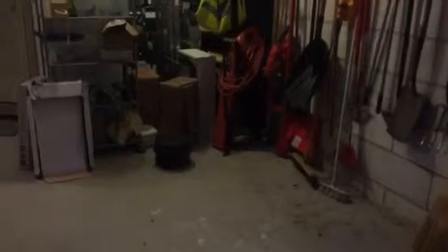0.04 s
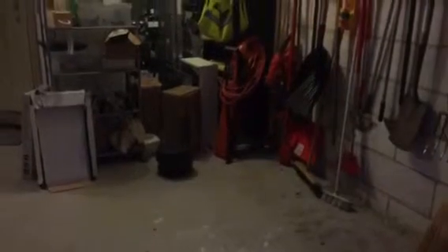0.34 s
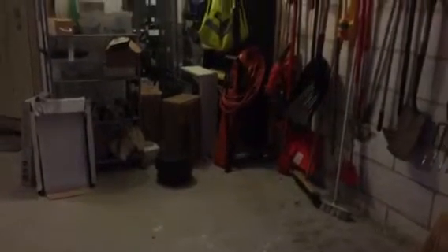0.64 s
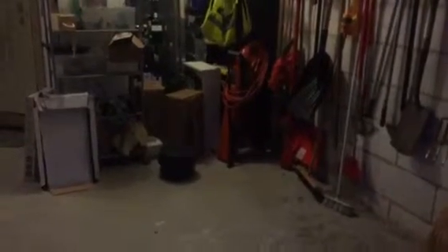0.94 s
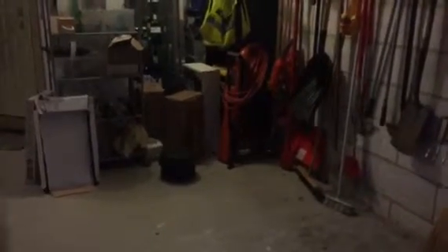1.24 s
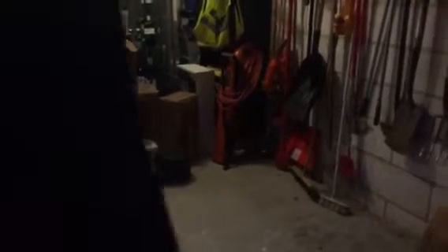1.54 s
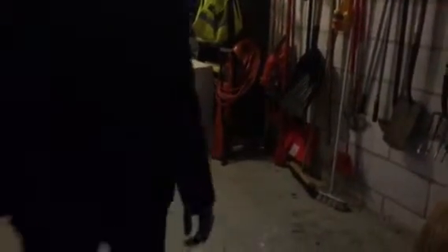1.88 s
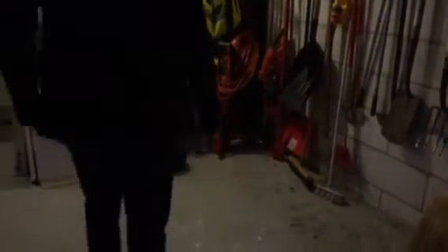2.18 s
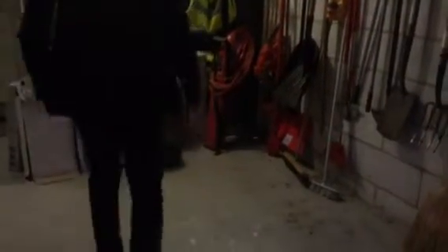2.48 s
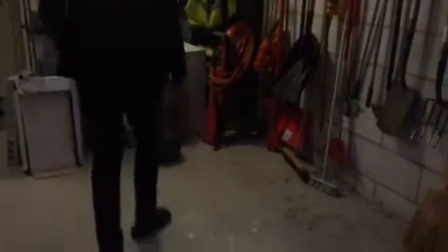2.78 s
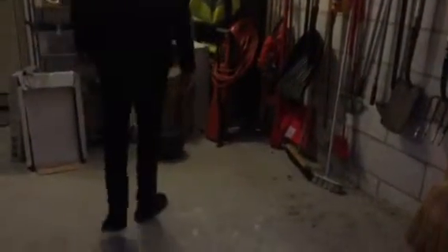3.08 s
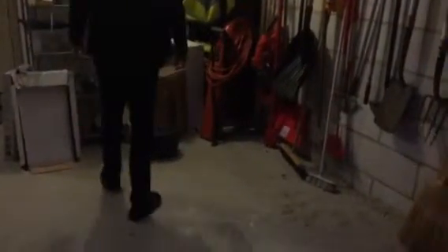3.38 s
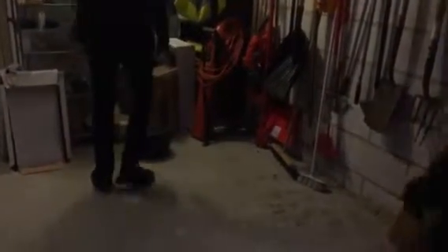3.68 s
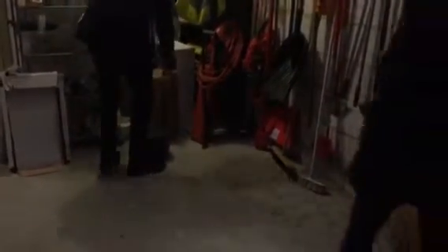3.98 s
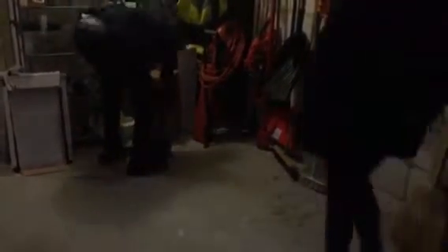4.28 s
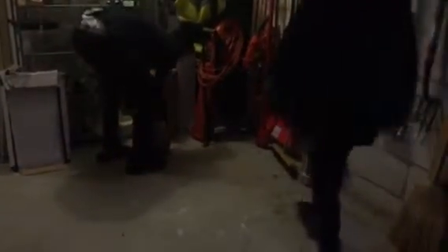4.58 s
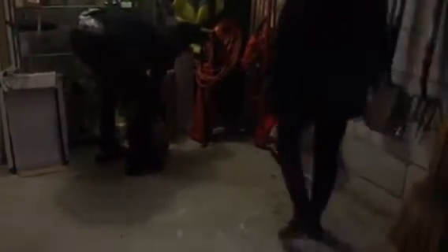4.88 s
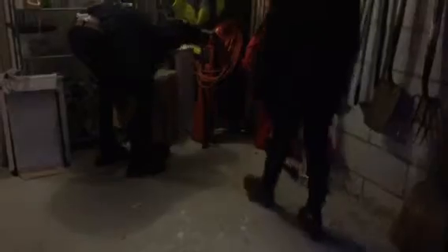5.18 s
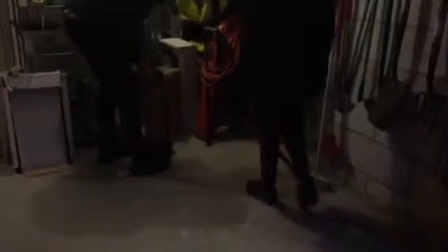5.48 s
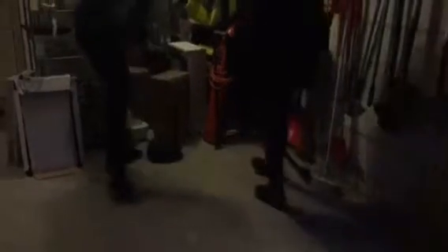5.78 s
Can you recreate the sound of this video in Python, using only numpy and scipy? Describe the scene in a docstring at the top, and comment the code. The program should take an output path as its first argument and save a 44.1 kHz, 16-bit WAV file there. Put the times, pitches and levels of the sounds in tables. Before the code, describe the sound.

In a quiet, cluttered garage with little echo, uneven footsteps scuff and crunch on concrete. Early on, clothing swishes and a hollow object gives a quick, rattling run of knocks nearby, the loudest sound. The steps go on with tiny squeaks and cracking grit. Near the end a heavy case grinds briefly across the floor, bumps a shelf and is set down, and a small metal fitting clinks faintly.

```python
"""Two people shuffle across the gritty concrete floor of a cluttered garage and shift a heavy case.
Over a quiet rumble, soles scrape, tap and thud from the start; grit snaps and rubber squeaks briefly.
From 1.6 s jackets rustle, and just before 2 s something hollow is knocked nearby and rattles.
After more steps, near 5 s, the case is dragged, tipped against a shelf and set down. Last, a small
metal fitting clinks as the case is let go. The stored things keep the room's echo short."""
import sys
import numpy as np
from scipy import signal
from scipy.fft import rfft, irfft, next_fast_len
from scipy.io import wavfile

SR = 44100
rng = np.random.default_rng(int(sys.argv[2]) if len(sys.argv) > 2 else 0)


def transcribe(u):
    """Save the signal u as a 16-bit wav file named by the first command-line argument.

    u: samples, shape (n,) or (channels, n), limited to [-1, 1]; the rate is SR.
    q: integer samples, one column per channel.
    """
    v = np.clip(np.atleast_2d(u).T, -1, 1)
    q = np.round(v * 32767).astype(np.int16)
    wavfile.write(sys.argv[1], SR, q)


N = 257385
TIME = np.arange(N) / SR
SHOT = TIME[:SR // 2]  # half a second: the clock for one short sound


def undb(db):
    """Turn decibels into a number to multiply by."""
    return 10 ** (np.asarray(db) / 20)


def unit(x):
    """Scale x to an average strength (rms) of 1."""
    return x / np.sqrt(np.mean(x ** 2))


def along(points, hz):
    """Read between the (f/Hz, value) rows of a table, with octaves evenly spaced."""
    f, value = np.transpose(points)
    return np.interp(np.log(hz + 1), np.log(f), value)


def colour(x, points):
    """Shape the tone of x by (f/Hz, level/dB) rows; clicks keep their sharp start."""
    size = next_fast_len(len(x) + 2048, True) * 2
    gains = undb(along(points, np.fft.rfftfreq(size, 1 / SR)))
    cepstrum = irfft(np.log(gains))
    cepstrum[1:size // 2] *= 2  # folded so the filter rings only after a click
    cepstrum[size // 2 + 1:] = 0
    return irfft(rfft(x, size) * np.exp(rfft(cepstrum)))[:len(x)]


def band(x, hz, kind="bandpass", order=2):
    """Keep what lies between, below or above the given frequencies."""
    return signal.sosfilt(signal.butter(order, np.minimum(hz, SR / 2 - 1), kind, fs=SR, output="sos"), x)


def fade(t60):
    """A dying sound; t60, the fade time, is the seconds it takes to drop 60 dB."""
    return np.exp(-np.log(1000) * SHOT / max(t60, 1 / SR))


def add(out, s, x):
    """Mix x into out, starting at s seconds."""
    i = max(int(s * SR), 0)
    out[i:i + len(x)] += x[:max(N - i, 0)]


def grains(rate, spread_db):
    """Random clicks, about rate a second; spread_db makes a few louder (+) or softer (-)."""
    sizes = undb(spread_db * np.minimum(rng.exponential(size=N), 4))
    return unit((rng.random(N) < rate / SR) * sizes * rng.standard_normal(N))


def shifting(x, depth_db, width_hz, hold_s):
    """Narrow bands of x grow and shrink as the rubbing surfaces touch in new places."""
    _, _, frames = signal.stft(x, nperseg=1024, noverlap=768)
    peaks = rng.standard_normal(frames.shape)
    for axis, span in enumerate((width_hz * 1024 / SR, hold_s * SR / 256)):
        keep = np.exp(-1 / span)
        peaks = signal.lfilter([1], [1, -keep], peaks, axis=axis)  # smooth over pitch, then time
    return signal.istft(frames * undb(depth_db * unit(peaks)), nperseg=1024, noverlap=768)[1][:N]


def stroke(start, push_s, glide_s, t60, sag_db_per_s=50.5):
    """Loudness of one slide: it swells with the push, sags as friction slows it, then dies."""
    age = TIME - start
    swell = np.clip(age / max(push_s, 1 / SR), 0, 1) ** 1.54
    sag = undb(-sag_db_per_s * np.clip(age - push_s, 0, glide_s))
    return swell * sag * np.exp(-np.log(1000) * np.maximum(age - push_s - glide_s, 0) / t60)


def bumps(table, t60, width, rise_s, rough):
    """Dull blows: each is one dying tone, roughened by the uneven contact."""
    out = np.zeros(N)
    swell = fade(t60) * (1 - np.exp(-SHOT / rise_s))
    for s, db, hz in table:
        tone = swell * np.sin(2 * np.pi * hz * SHOT)
        rattle = band(rng.standard_normal(len(SHOT)) * swell, [hz / (1 + width), hz * (1 + width)])
        add(out, s, undb(db) * (tone + rough * np.std(tone) * unit(rattle)))
    return out


def ring(notes, rise_s):
    """A struck object: its own notes swell while the blow spreads through it, then die."""
    tones = sum(undb(db) * fade(t60) * np.sin(2 * np.pi * hz * SHOT) for hz, db, t60 in notes)
    return tones * (1 - np.exp(-SHOT / rise_s))


def shaken(blows, rise_s, t60):
    """Loudness of loose parts shaken by blows: their energy adds up and drains away."""
    energy = np.zeros(N)
    for s, db, *_ in blows:
        add(energy, s, (undb(db) * fade(t60) * (1 - np.exp(-SHOT / rise_s))) ** 2)
    return np.sqrt(energy)


# tone of the background: f/Hz, level/dB
AIR_TONE = [(15, -29), (25, -4), (76, 3.5), (270, -2.5), (476, -14), (560, -9), (754, -13.5), (962, -5.5),
            (1650, -19), (3720, -22.5), (4870, -26), (9320, -28), (10400, -33), (13200, -29), (16000, -41)]
def air():
    """The room rumbles quietly and the microphone hisses."""
    return undb(-59.5) * unit(colour(rng.standard_normal(N), AIR_TONE))


# tone of a sole rubbing concrete: f/Hz, level/dB
SCRAPE_TONE = [(150, -29), (250, -9), (386, -9), (468, -15.5), (761, -6), (1420, -7), (1550, -5.5),
               (2020, -4.5), (2160, -2.5), (3840, -9), (4900, -12.5), (5350, -17), (7000, -18),
               (10400, -24.5), (13400, -26), (16000, -40.5)]
# soles sliding: t/s, push/s, glide/s, level/dB, extra weight/dB, extra grit/dB
SOLE_SLIDES = [(0.061, 0.023, 0.047, -67, 4.5, 8), (0.119, 0.016, .23, -51, -1, 0.5),
               (0.605, 0.024, 0.075, -52.5, -2, 3), (0.792, 0.0044, 0.0043, -58, 2.5, -5),
               (0.889, 0.016, 0.043, -39.5, -3, -7.5), (1.003, 0.0071, 0.016, -57, 3, -15),
               (1.229, 0.011, 0.0062, -53, -1, -5.5), (1.371, 0.0033, 0.038, -43.5, -7, -11),
               (1.403, 0.027, 0.032, -41, -6.5, -7.5), (2.355, 0.0074, 0.0044, -47.5, -17, -18),
               (2.361, 0.031, 0.039, -42.5, -7, -7.5), (2.457, 0.025, 0.026, -44, -8, -8),
               (2.885, 0.0089, 0.052, -35, -9, -17), (2.921, 0.021, 0.066, -37, -3.5, -13),
               (3.02, .02, 0.033, -57.5, -1, 2), (3.102, 0.014, 0.052, -54.5, 2, -7),
               (3.22, 0.025, 0.015, -53.5, 1, -7.5), (3.357, 0.12, 0.023, -35, -5, -10.5),
               (3.56, 0.05, 0.13, -59, -11, 1.5), (3.863, 0.05, 0.018, -42, 5, -5.5),
               (3.985, 0.01, 0.036, -54.5, -0.5, -5), (4.175, 0.013, 0.022, -39, -3, -14.5),
               (4.662, 0.019, .012, -62, -0.5, 1.5), (4.720, .01, 0.043, -55, 5, 0),
               (5.143, 0.0051, 0.004, -67, -1, 16)]
def scuffs():
    """Grit rolls under a sliding sole: weight brings out the low rasp, loose grains the bite and hiss."""
    rub = shifting(grains(rate=9000, spread_db=2.1), depth_db=3.3, width_hz=68, hold_s=0.024)
    rub = colour(rub, SCRAPE_TONE)
    rasp = unit(band(rub, 1250, "lowpass", order=4))
    scrape = unit(band(rub, [1250, 3400], order=4))
    bite = undb(-0.76) * unit(band(rub, [3400, 5600], order=4))
    hiss = unit(band(rub, 5200, "highpass", order=4))
    sliding, pressing, rolling = np.zeros((3, N))
    for start, push_s, glide_s, db, weight_db, grit_db in SOLE_SLIDES:
        slide = undb(db) * stroke(start, push_s, glide_s, t60=0.18)
        roll = undb(db + grit_db) * stroke(start, push_s, glide_s, t60=0.16)  # loose grit stops first
        sliding = np.maximum(sliding, slide)
        pressing = np.maximum(pressing, undb(weight_db) * slide)
        rolling = np.maximum(rolling, roll)
    return sliding * scrape + pressing * rasp + np.sqrt(sliding * rolling) * bite + rolling * hiss


# light blows: t/s, level/dB, f/Hz
LIGHT_TAPS = [(0.126, -41, 435), (0.202, -32.5, 473), (0.746, -48, 284), (0.823, -41, 315),
              (1.111, -43, 327), (1.549, -48.5, 643), (1.632, -38, 952), (1.663, -45, 1020),
              (2.203, -52, 260), (2.662, -51, 520), (3.197, -41, 251), (3.244, -45.5, 480),
              (3.392, -41, 306), (3.934, -36.5, 920), (4.186, -33.5, 660), (4.335, -47.5, 327),
              (4.727, -37, 928), (5.175, -42, 313), (5.642, -41.5, 768), (5.743, -43, 324)]
def taps():
    """Shoes and stored things tap, each with a short, rough note."""
    return bumps(LIGHT_TAPS, t60=0.1, width=0.66, rise_s=0.0017, rough=0.96)


# heels and soles landing: t/s, level/dB, f/Hz
LANDINGS = [(0.129, -36.5, 191), (0.195, -35, 181), (0.832, -42, 144), (0.856, -37, 95),
            (0.925, -37.5, 145.5), (1.105, -49, 243), (1.231, -45.5, 234), (1.376, -48.5, 203),
            (1.477, -48, 186), (1.594, -44, 153), (2.39, -49, 237), (2.66, -45.5, 134.4),
            (3.196, -32.5, 146), (3.247, -38.5, 126), (3.386, -42, 122), (3.401, -30, 177.7),
            (3.559, -47, 263), (3.93, -44, 151), (3.99, -34.5, 188), (4.341, -36.5, 125), (4.742, -36, 191),
            (5.741, -40, 272)]
def footfalls(thump_hz=69.1):
    """Each landing is a thud of the shoe over a deeper thump of the walker's weight."""
    thuds = bumps(LANDINGS, t60=0.13, width=1.1, rise_s=0.00165, rough=0.4)
    thumps = [(s, db - 12.5, thump_hz) for s, db, _ in LANDINGS]
    return thuds + bumps(thumps, t60=0.22, width=0.4, rise_s=0.0065, rough=0.4)


# tone of breaking grit: f/Hz, level/dB
GRIT_TONE = [(500, -2), (1500, -4.5), (3300, -5.5), (5000, -3.5), (6500, -6.5), (10000, -10.5),
             (15500, -15.5)]
# grains crushed under a sole: t/s, level/dB, extra treble/dB
GRIT_SNAPS = [(0.130, -44.5, 14), (0.569, -59.5, 18), (1.009, -29.5, -1.5), (1.618, -40.5, -28),
              (1.830, -51, 8), (2.36, -37, -8), (2.487, -26.5, -6), (2.496, -25.5, -22), (2.709, -30, 3),
              (2.719, -39.5, 6.5), (3.256, -40.5, 0.5), (3.407, -42.5, 12), (3.806, -33.5, -22),
              (3.997, -27.5, -4), (4.703, -34, -4), (4.741, -33, -9), (4.784, -33, -14), (4.8, -32, -15),
              (5.658, -42, -5)]
def snaps():
    """A grain breaks in an instant; its crumbs crackle after it."""
    out = np.zeros(N)
    shape = fade(0.018) + undb(-11) * fade(0.11)
    for s, db, treble_db in GRIT_SNAPS:
        burst = colour(rng.standard_normal(len(SHOT)) * shape, GRIT_TONE)
        treble = band(burst, 5800, "highpass", order=1)
        add(out, s, undb(db) * (burst + (undb(treble_db) - 1) * treble))
    return out


# a sole catching on the floor: t/s (loudest moment), level/dB, f/Hz, half-length/s
SOLE_SQUEAKS = [(0.904, -37, 1112, 0.011), (2.498, -35.5, 2464, 0.019), (2.498, -35.5, 3900, 0.014),
                (2.915, -29.5, 2144, 0.017), (3.125, -45.5, 1300, 0.018), (3.472, -37, 985, 0.022)]
def squeaks():
    """Rubber sticks and slips at an unsteady rate, making a brief, wavering note."""
    out = np.zeros(N)
    waver = unit(band(rng.standard_normal(N), 342, "lowpass"))
    for s, db, hz, half_s in SOLE_SQUEAKS:
        phase = 2 * np.pi * np.cumsum(hz * (1 + 0.032 * waver)) / SR
        out += undb(db) * np.exp(-((TIME - s) / half_s) ** 2) * np.sin(phase)
    return out


# tone of rubbing cloth: f/Hz, level/dB
CLOTH_TONE = [(290, -33), (500, -27), (538, -23), (708, -3), (1110, -6.5), (2980, -5.5), (4870, -13.5),
              (6700, -17), (16000, -27.5)]
# jackets moving: t/s, push/s, glide/s, level/dB
JACKET_RUBS = [(1.587, 0.028, 0.011, -57.5), (1.856, 0.062, .005, -36), (1.991, 0.086, 0.14, -54.5),
               (3.783, .02, 0.069, -54), (5.231, 0.22, 0.13, -59.5), (5.61, .03, 0.035, -65.5),
               (5.708, .032, 0.013, -61)]
def jackets():
    """Cloth slides over cloth in a fine, soft hiss."""
    rub = shifting(grains(rate=14000, spread_db=4.5), depth_db=5.5, width_hz=40, hold_s=0.025)
    moving = sum(undb(db) * stroke(s, push, glide, t60=0.22) for s, push, glide, db in JACKET_RUBS)
    return moving * unit(colour(rub, CLOTH_TONE))


# notes the hollow thing rings with: f/Hz, level/dB, fade time/s
HOLLOW_NOTES = [(265, -20, 0.037), (404, -11, 0.058), (615, -8, 0.077), (697, 3, 0.029), (826.5, -11, 0.14),
                (1225, -13, 0.057), (1278, -3, 0.032), (1422, -19.5, 0.05), (1598, -12.5, .045),
                (1935, -8, 0.018), (2333, -15.5, .035), (2650, -12.5, 0.0344), (3520, -20, 0.017)]
# tone of the crack as it is hit: f/Hz, level/dB
CRACK_TONE = [(200, -21.5), (450, -12), (750, 16), (1400, 0), (2500, -7.5), (4500, -8.5), (6000, -3),
              (7500, -29.5), (15500, -16)]
# knocks on it: t/s, level/dB, f/Hz (muffled above this; higher for a harder hit)
HOLLOW_KNOCKS = [(1.7588, -16.5, 454), (1.7708, -23.5, 505), (1.831, -29.5, 510), (1.842, -31.5, 550),
                 (1.8808, -9, 940), (1.9148, -9, 3670), (1.9176, -4.5, 2920), (1.9335, -12, 1900),
                 (1.9528, -13, 1100), (1.9675, -14, 1700)]
def knocks():
    """The hollow thing is hit and rattles; softer hits lose the high notes and the crack."""
    body = band(ring(HOLLOW_NOTES, rise_s=0.0011), 290, "highpass")  # its ring keeps no deep bass
    dull_body = band(body, 800, "lowpass", order=1)
    rattle = signal.fftconvolve(grains(rate=560, spread_db=-7), dull_body)[:N]
    out = undb(-20.5) * shaken(HOLLOW_KNOCKS, rise_s=0.009, t60=0.16) * unit(rattle)
    for s, db, hard_hz in HOLLOW_KNOCKS:
        crack = undb(-5.5) * colour(rng.standard_normal(len(SHOT)) * fade(0.018), CRACK_TONE)
        knock = band(body, hard_hz, "lowpass") + band(crack, hard_hz, "lowpass", order=1)
        add(out, s, undb(db) * knock)
    return out


# tone of the case's rumble: f/Hz, level/dB
RUMBLE_TONE = [(41, -52.5), (70, -8), (145, -2), (209, -13), (372, -9.5), (566, -28), (874, -33),
               (2000, -57), (2600, -61), (4400, -120)]
# notes the shelf and the case ring with: f/Hz, level/dB, fade time/s
SHELF_NOTES = [(145.4, -5.5, 0.16), (384, 2.5, 0.05), (580, -7.5, 0.057), (732, 11, 0.035), (773, 5, 0.041),
               (910, -19, 0.04), (1520, -3.5, 0.052)]
CASE_NOTES = [(115, -1.5, 0.11), (179, -13, 0.1), (334, -3, 0.07), (619, 7, 0.042), (680, 2, 0.053),
              (1010, -13, 0.058), (1070, -7, 0.049)]
def heavy_case():
    """The case grinds over the floor, nudges the shelf and lands; its contents jostle at each bump."""
    nudge, landing = (4.966, -24), (5.151, -16.5)  # t/s, level/dB
    dragged = undb(-49) * stroke(start=4.77, push_s=0.16, glide_s=0.31, t60=0.15)
    bumped = undb(-17) * shaken([nudge, landing], rise_s=0.0035, t60=0.15)
    rumble = unit(colour(grains(rate=300, spread_db=-0.5), RUMBLE_TONE))
    out = (dragged + bumped) * rumble
    for (s, db), notes in ((nudge, SHELF_NOTES), (landing, CASE_NOTES)):
        jostle = 1 + 0.45 * unit(band(rng.standard_normal(len(SHOT)), 160, "lowpass"))
        add(out, s, undb(db) * ring(notes, rise_s=0.021) * jostle)
    return out


# notes of the small metal piece: f/Hz, level/dB, fade time/s
METAL_NOTES = [(4400, -4, 0.13), (9351, -5, .2), (10060, -12, .2), (12200, -7, .2), (14080, -1, .09)]
def clink(at_s=5.742):
    """A light piece of metal rings high and faint as the case is let go."""
    out = np.zeros(N)
    add(out, at_s, undb(-55) * ring(METAL_NOTES, rise_s=0.004))
    return out


# how long the room rings: f/Hz, fade time/s
ECHO_FADES = [(100, 0.55), (700, 0.35), (3000, 0.35), (6000, 0.077), (14000, 0.14)]
def garage(x):
    """Echoes scattered by the clutter build up quickly; each octave fades in its own time."""
    tail = 0
    for hz in 60 * 2. ** np.arange(9):
        octave = band(rng.standard_normal(len(SHOT)), [hz / np.sqrt(2), hz * np.sqrt(2)])
        tail = tail + octave * fade(along(ECHO_FADES, hz))
    tail = tail * np.clip((SHOT - 0.004) / 0.019, 0, 1)
    return signal.fftconvolve(x, tail / np.sqrt(np.sum(tail ** 2)))[:N]


def scene():
    """Every sound is heard directly; all but the jackets and the background also echo."""
    slides = scuffs() + squeaks()
    steps = taps() + footfalls()
    grit = snaps()
    hollow = knocks()
    case = heavy_case() + clink()
    echo = garage(undb(-17) * slides + undb(-15) * steps + undb(-16.5) * grit
                  + undb(-19) * hollow + undb(-21) * case)
    return (air() + slides + steps + grit + jackets() + hollow + case + echo)[None]


def record(dry):
    """The microphone drops the deepest bass and the recorder cuts the highest treble."""
    treble_cut = signal.ellip(10, 0.2, 70, 15850, fs=SR, output="sos")
    return signal.sosfilt(treble_cut, band(dry, 36, "highpass", order=3))


dry = scene()
out = record(dry)
transcribe(out)
```